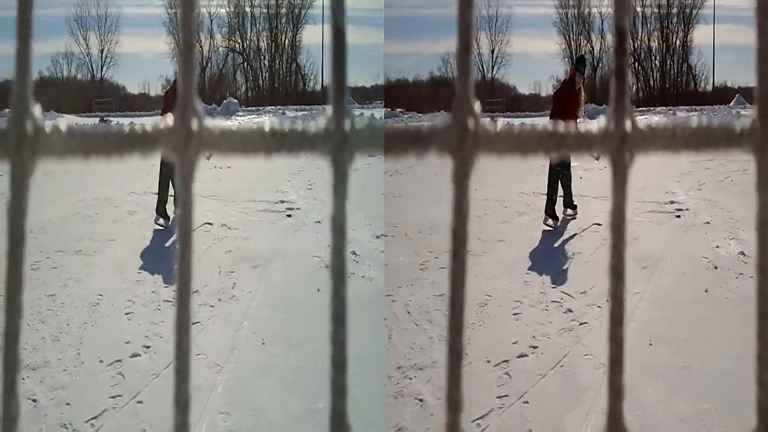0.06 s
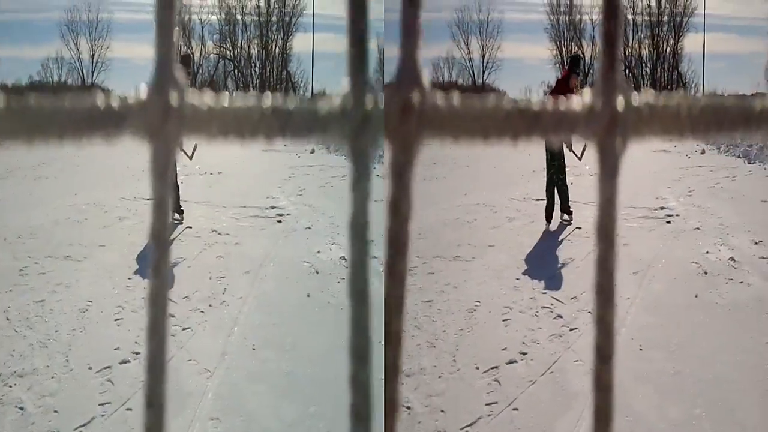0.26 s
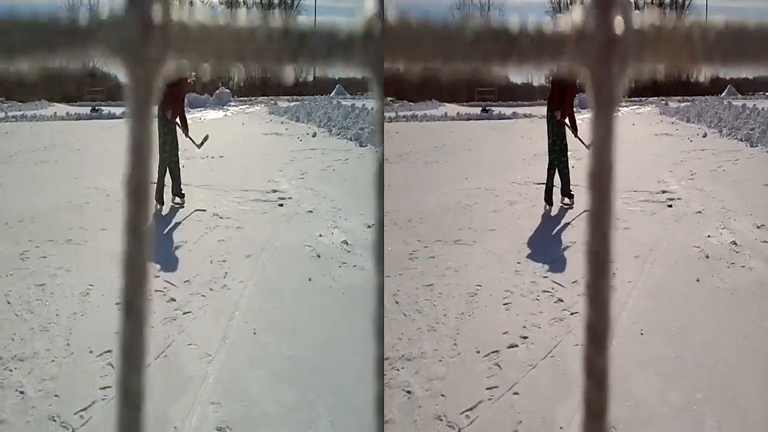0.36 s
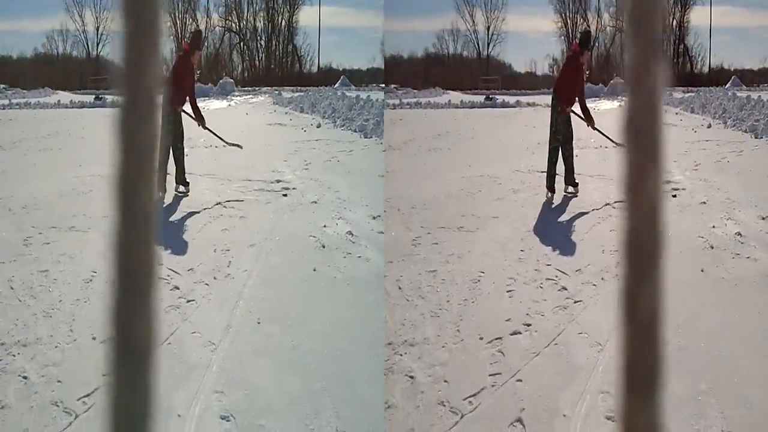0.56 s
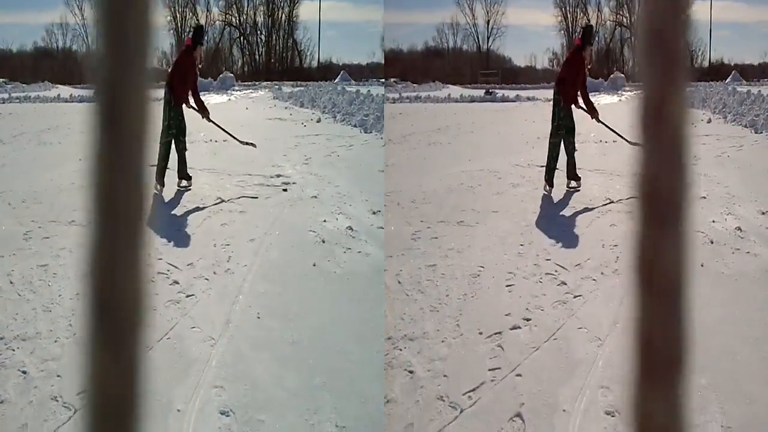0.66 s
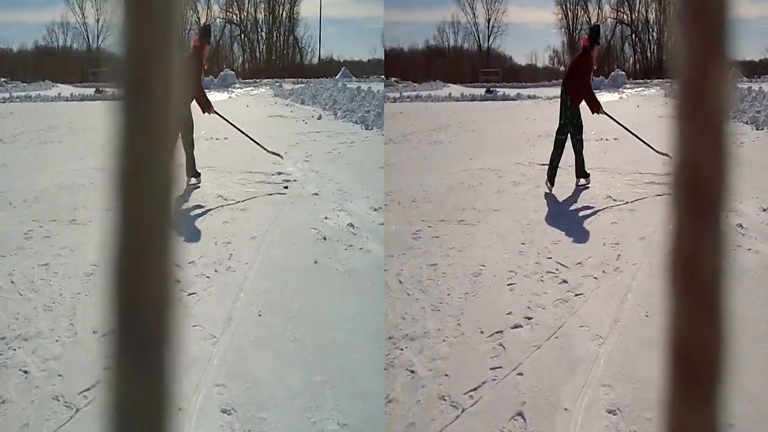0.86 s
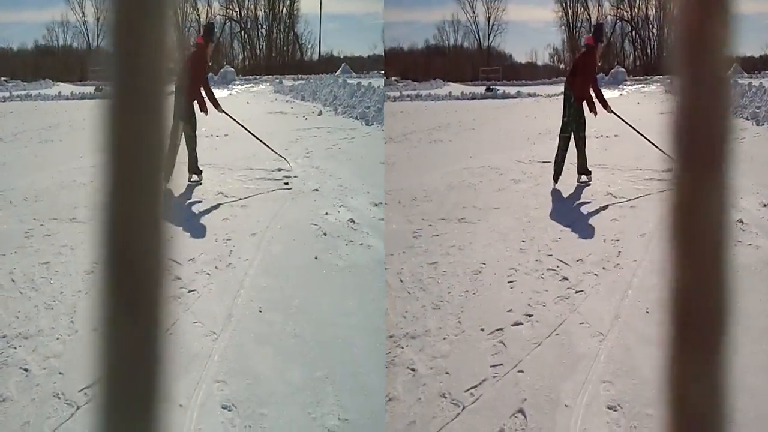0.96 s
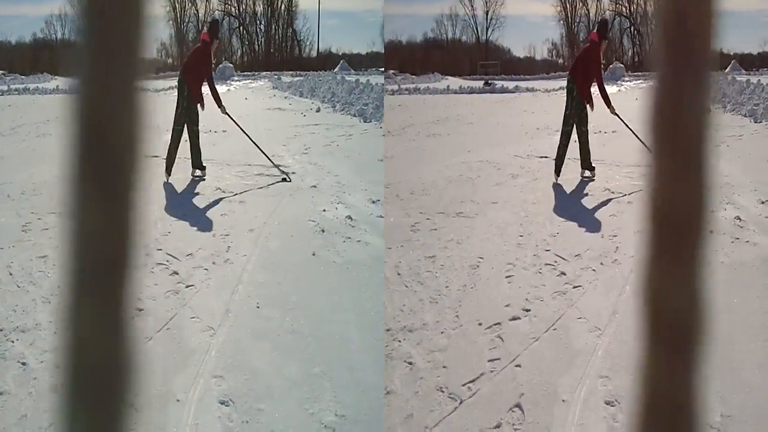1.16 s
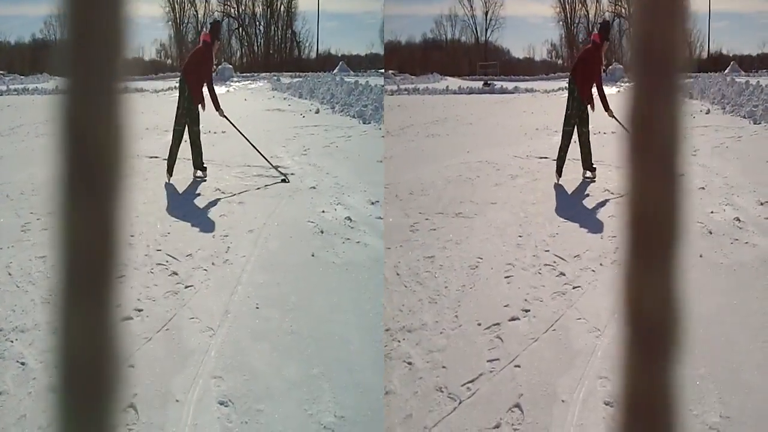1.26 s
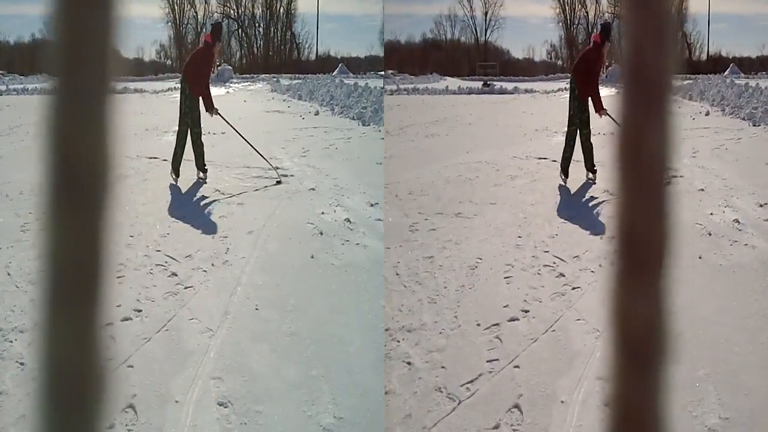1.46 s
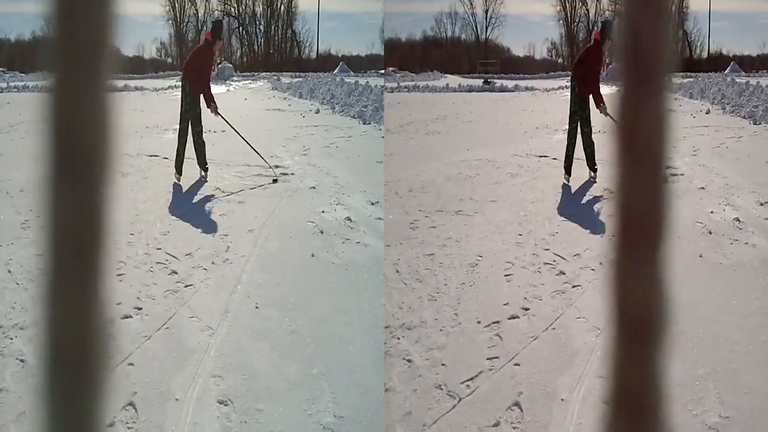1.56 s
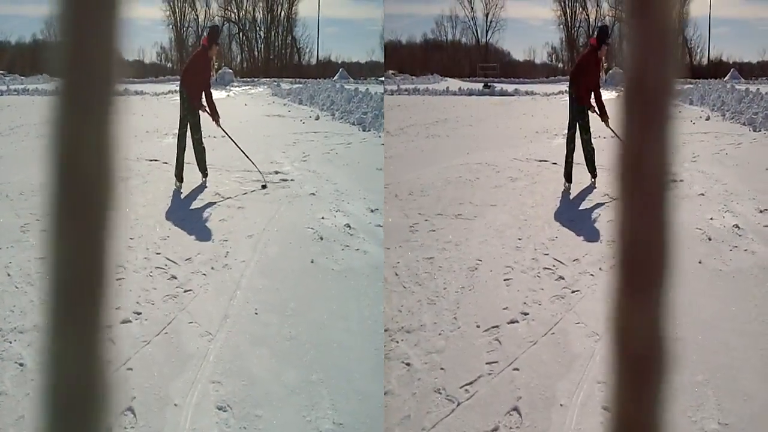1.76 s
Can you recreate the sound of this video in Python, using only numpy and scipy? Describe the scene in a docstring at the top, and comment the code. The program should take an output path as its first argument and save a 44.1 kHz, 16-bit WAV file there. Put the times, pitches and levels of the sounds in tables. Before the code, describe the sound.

A puck slams into a close wire fence with a clipped, bright crack, brief rattle and thin ringing wires; then quiet ticks and a long gritty stick scrape on an open snowy rink, close thin-sounding stereo microphone.

```python
"""A short scrape, a faint tick and a low hum lead in as the puck slides; then it slams into a wire mesh fence.
The slam is a clipped crack of damped modes and noise, a short rattle, then two wires that ring on and beat.
Out on the snowy rink, shaped noise makes stick and skates scrape and tick, and drags the blade in a long stroke.
Faint wind, a bed of coloured noise, lies underneath."""
import sys
import numpy as np
from scipy import signal
from scipy.fft import rfft, irfft, next_fast_len
from scipy.io import wavfile
from scipy.ndimage import uniform_filter1d, map_coordinates

SR = 44100
rng = np.random.default_rng(int(sys.argv[2]) if len(sys.argv) > 2 else 0)


def output_pcm(signal):
    """Save a mono or channel-first signal as 16-bit PCM at the path in sys.argv[1].

    Samples are clipped to [-1, 1] before scaling.
    """
    pcm = np.clip(np.atleast_2d(signal).T, -1, 1) * 32767
    wavfile.write(sys.argv[1], SR, np.round(pcm).astype(np.int16))


N = 79380  # samples, 1.8 s


def amp(db):
    """Decibels to gain."""
    return 10 ** (np.asarray(db) / 20)


def unit(x):
    """Scale to rms 1."""
    return x / np.sqrt(np.mean(x ** 2) + 1e-20)


def along(points, hz):
    """Read a table of (f/Hz, value) on a log frequency axis."""
    f, value = np.transpose(points)
    return np.interp(np.log(hz + 1), np.log(f + 1), value)


def curve(points):
    """Read a table of (t/s, value) at every sample."""
    return np.interp(np.arange(N) / SR, *np.transpose(points))


def since(s):
    """Seconds since s, zero before it."""
    return np.maximum(np.arange(N) / SR - s, 0)


def burst(s, t60, attack=0.00069):
    """Envelope from s on: a quick attack and an exponential release of 60 dB in t60 seconds."""
    age = since(s)
    return (1 - np.exp(-age / attack)) * amp(-60 * age / t60)


def wobble(rate):
    """A smooth random curve, rate knots a second."""
    knots = rng.standard_normal(4096)
    return map_coordinates(knots, [np.arange(N) * rate / SR], mode="wrap")


def filtered(x, response):
    """Multiply the spectrum of x by a response of frequency, padded against wrap-around."""
    m = next_fast_len(N + SR // 2)
    hz = np.fft.rfftfreq(m, 1 / SR)
    return irfft(rfft(x, m) * response(hz), m)[..., :N]


def hiss(colour):
    """Mono coloured noise of rms 1."""
    return unit(filtered(rng.standard_normal(N), lambda hz: amp(along(colour, hz))))


def rush(colour, alike):
    """Stereo coloured noise of rms 1; mixing mid and side sets how alike left and right are."""
    def mid_side_gains(hz):
        turn = np.arccos(np.clip(along(alike, hz), 0, 1)) / 2
        return np.array([np.cos(turn), np.sin(turn)])

    mid, side = filtered(np.array([hiss(colour), hiss(colour)]), mid_side_gains)
    return unit(np.array([mid + side, mid - side]))


def band(hz, width):
    """A narrow band of noise of rms 1."""
    return unit(filtered(rng.standard_normal(N), lambda f: 1 / (1 + (2 * (f - hz) / width) ** 4)))


def ports(x, balance, phase=((1, 0),)):
    """Level and phase differences between the two microphone ports, split evenly over both."""
    half = np.array([[.5], [-.5]])
    return filtered(x, lambda hz: amp(half * along(balance, hz)) * np.exp(1j * half * along(phase, hz)))


def ring(modes, s):
    """Damped sine modes set going together at s."""
    t = since(s)[:SR * 3 // 2 + SR // 4]
    tone = sum(amp(db - 60 * t / t60) * np.sin(2 * np.pi * hz * t) for hz, db, t60 in modes)
    return np.pad(tone, (0, N - len(t)))


HIT_S, REBOUND_S = 0.1825, .529  # the slam, and a light second knock
# Free wires that ring on after the slam, and other wires set going by the second knock.
# Columns of both: f/Hz, level/dB, t60/s
FREE_WIRES = [(1765.7, -40, 2.01), (1800, -50.5, 1), (1858.4, -30, 1.195), (1958, -40, 0.27),
              (2020, -48, 0.97), (2110, -56.5, .5), (5020, -55, 0.51), (5500, -42.5, .14), (9500, -41, .2),
              (9637, -40.5, 0.2), (9987, -37, .15)]
REBOUND_WIRES = [(1345, -50, 0.1), (1907, -51, 0.4), (2140, -61, 0.17), (2380, -51.5, 0.13),
                 (5830, -62, 0.28)]
# Colour of the rattling mesh joints: f/Hz, level/dB
RATTLE_COLOUR = [(100, -33), (350, -13), (700, -6), (1500, -2.5), (2300, -1), (3800, -4), (4300, -6.5),
                 (5200, 1), (7000, -10), (9800, 0), (12500, -12.5), (15500, -15)]
RATTLE_DB, RATTLE_T60_S = -14, 0.077
SHIVER_DB, SHIVER_T60_S = -43.5, 0.37  # the fainter, longer tail of the rattle
BUZZ_DEPTH, BUZZ_T60_S = .08, 0.93  # wires chatter against their neighbours while they swing wide
# Left minus right at the ports for the fence: f/Hz, level/dB
FENCE_PORT_BALANCE = [(60, 0.5), (350, 1.5), (2700, -1), (6000, 6.5), (8600, 10.5), (10200, 8.5),
                      (11600, -11), (12700, -16), (14800, -2)]
# Lead of the left port for the fence: f/Hz, phase/rad
FENCE_PORT_PHASE = [(300, .25), (1300, .45), (2800, .95), (7000, 1.7), (9500, 2.1), (12500, 1.4)]


def fence():
    """The puck cracks against the mesh; its joints rattle as noise and the free wires ring on as sines."""
    rattle = amp(RATTLE_DB) * burst(HIT_S, RATTLE_T60_S, attack=0.0022)
    shiver = amp(SHIVER_DB + 3 * wobble(350)) * burst(HIT_S, SHIVER_T60_S)
    joints = (rattle + shiver) * rush(RATTLE_COLOUR, [(1000, 1.0), (10000, 0.25)])
    buzz = 1 + BUZZ_DEPTH * burst(HIT_S, BUZZ_T60_S) * wobble(370)
    wires = buzz * ring(FREE_WIRES, HIT_S) + ring(REBOUND_WIRES, REBOUND_S)
    return ports(impact() + wires + clusters() + joints, FENCE_PORT_BALANCE, FENCE_PORT_PHASE)


# Contacts of puck and wires, timed from the first touch: t/ms, level/dB, softness/ms
PUCK_CONTACTS = [(0, -4.5, 0.15), (1.4, -0.5, 0.006), (3.1, -6.5, 0.006), (7.8, -27.5, 0.015),
                 (12.1, -33, 0.012)]
# Damped modes of the mesh at the point of impact: f/Hz, level/dB, t60/s
MESH_MODES = [(502.3, -27.5, 0.046), (922.7, -20, 0.03), (1151.8, -16, 0.028), (1364, -16.5, 0.021),
              (1496, -21, 0.028), (2262, -20.5, 0.031), (2734, -25.5, 0.0098), (3272, -17.5, 0.022),
              (3496, -24, 0.037), (3809, -13.5, 0.018), (4575, -22, .015), (5197, -18, 0.042),
              (7600, -18, .018), (8670, -14, 0.023), (9892, -3.5, .014), (10680, -14.5, 0.027),
              (11350, -4.5, 0.008), (12530, -13.5, 0.011)]
# Colour of the noise in the crack: f/Hz, level/dB
CRACK_COLOUR = [(150, -26.5), (600, -19), (1200, 1.5), (4000, 0), (7000, -3), (10000, 3), (12300, -8),
                (15500, -11)]
CRACK_DB, CRACK_T60_S = -1.5, 0.0083


def impact():
    """Each contact cracks and pumps the mesh's damped modes; a softer contact drives the high ones less."""
    t = np.arange(SR // 4) / SR
    contacts = [(np.maximum(t - HIT_S - ms / 1000, 0), db, soft) for ms, db, soft in PUCK_CONTACTS]

    def force(hz, db, soft_ms):
        return amp(db) / (1 + (np.pi * hz * soft_ms / 1000) ** 2)

    def decay(age, t60):
        return (1 - np.exp(-age / .0001)) * amp(-60 * age / t60)

    out = np.zeros(len(t))
    for hz, level, t60 in MESH_MODES:
        swing = sum(force(hz, db, soft) * decay(age, t60) for age, db, soft in contacts)
        out += amp(level) * swing * np.sin(2 * np.pi * (hz * t + rng.random()))
    for age, db, soft in contacts:
        crack = filtered(hiss(CRACK_COLOUR), lambda hz: force(hz, db, soft))[:len(t)]
        out += amp(CRACK_DB) * crack * decay(age, CRACK_T60_S)
    return np.pad(out, (0, N - len(t)))


# Groups of nearly equal short wires, blurred into bands: f/Hz, width/Hz, level/dB, t60/s
WIRE_CLUSTERS = [(694, 150, -52.5, .33), (1880, 260, -36, 0.67), (3860, 260, -46, .3),
                 (5150, 660, -38.5, 0.31), (9450, 470, -33.5, 0.12)]


def clusters():
    """Many short wires ring together as narrow bands of noise."""
    return sum(amp(db) * band(hz, width) * burst(HIT_S, t60) for hz, width, db, t60 in WIRE_CLUSTERS)


# Sweep of the stick and the skates: t/s, level/dB
SWEEP_LEVEL = [(0, -46), (.024, -52.5), (.06, -48.5), (.105, -44.5), (.15, -50.5), (.18, -55), (.25, -54),
               (.3, -67), (.342, -57.5), (.362, -100), (.382, -59.5), (.392, -57), (.408, -63.5),
               (.452, -61.5), (.51, -77), (.9, -67), (1, -67.5)]
# Colour of that sweep: f/Hz, level/dB
SWEEP_TONE = [(88, -55), (150, -18), (204, -15.5), (364, -24.5), (556, -8), (918, -18.5), (1180, -14),
              (1800, -14.5), (2270, -8), (3400, -15), (4370, -13.5), (5510, -21), (7350, -10.5),
              (12100, -13.5), (15000, -19.5)]
# Blade dragged over the ice: t/s, level/dB
DRAG_LEVEL = [(.9, -92.5), (.958, -62), (.968, -52.5), (.995, -48.5), (1.015, -49.5), (1.06, -49),
              (1.12, -52), (1.25, -53), (1.277, -61.5), (1.285, -52.5), (1.35, -53), (1.374, -46),
              (1.39, -54), (1.48, -52), (1.515, -59), (1.568, -55), (1.582, -65.5), (1.63, -71.5),
              (1.8, -74.5)]
# Colour of its grains before the stick resonates: f/Hz, level/dB
DRAG_TONE = [(80, -13.5), (300, -8), (550, 1.5), (2000, 1.5), (4000, -1.5), (7000, -0.5), (12500, 1),
             (14000, -5.5), (15200, -10.5)]
# Resonances of the stick: f/Hz, width/Hz, level/dB
STICK_RESONANCES = [(534, 100, 5), (1152, 120, 6.5), (1865, 230, 9.5), (2380, 110, 3.5), (2790, 200, 5.5),
                    (3640, 170, 9), (4460, 400, 0), (5750, 440, -4), (6665, 330, 2), (9040, 770, 2.5)]
# Likeness of left and right for rink noises: f/Hz, likeness/0 to 1
RINK_LIKENESS = [(60, 0.34), (240, 0.93), (950, 1), (3770, 0.99), (15000, 0.5)]
PATCHY_DB = 2  # rms depth of the colour shifts
# The blade catches on ridges of ice, and each catch rings the stick; CATCH_DB is relative to the rasp.
CATCHES_PER_S, CATCH_DB, CATCH_SCATTER_DB = 110, -12, 0.5


def scrapes():
    """Grainy friction on snowy ice; the drag and its coarse catches sound through the stick's resonances."""
    sweep_level = amp(curve(SWEEP_LEVEL) + 2.6 * wobble(310) + 0.4 * wobble(40))
    sweep = rush(SWEEP_TONE, RINK_LIKENESS) * sweep_level

    def stick(f):
        return sum(amp(db) * 1j * f * width / (centre ** 2 - f * f + 1j * f * width)
                   for centre, width, db in STICK_RESONANCES)

    grains = rush(DRAG_TONE, RINK_LIKENESS) * amp(1.9 * wobble(700))
    rasp = unit(patchy(filtered(grains, lambda f: 1 + stick(f)), PATCHY_DB))
    moments = rng.random(N) < CATCHES_PER_S / SR
    catches = moments * amp(CATCH_SCATTER_DB * rng.uniform(-1.2, 1, N))
    drag = unit(drifting(rasp + amp(CATCH_DB) * unit(filtered(catches, stick))))
    return sweep + slide() + bite() + drag * amp(curve(DRAG_LEVEL) + .8 * wobble(110))


def patchy(x, depth_db):
    """The colour shifts at random from moment to moment, in smooth patches of time and frequency."""
    z = signal.stft(x, nperseg=512)[2]
    field = rng.standard_normal(z.shape[1:])
    field = uniform_filter1d(field, size=5, axis=0)  # across frequency
    field = uniform_filter1d(field, size=12, axis=1)  # across time
    return signal.istft(z * amp(depth_db * unit(field)), nperseg=512)[1][:, :N]


DRIFT_SHARE, DRIFTS_PER_S = .022, 14  # scale of the relative pitch change, and its random knots a second


def drifting(x):
    """The resonances slide a little in pitch as the blade rolls and the pressure shifts."""
    place = np.arange(N) + np.cumsum(DRIFT_SHARE * wobble(DRIFTS_PER_S))
    return np.array([map_coordinates(side, [place], order=5, mode="mirror") for side in x])


BITE_S, BITE_LENGTH_S, BITE_DB = 0.96, 0.16, -48.5
BITE_FROM_HZ, BITE_TO_HZ, BITE_HALF_WIDTH_HZ = 5600, 2240, 1400


def bite():
    """As the blade bites in, low noise on a falling sine makes a rasp that swells, sinks in pitch and fades."""
    u = np.clip(since(BITE_S) / BITE_LENGTH_S, 0, 1)
    hz = BITE_FROM_HZ * (BITE_TO_HZ / BITE_FROM_HZ) ** u
    noise = rng.standard_normal(N)
    rasp = unit(filtered(noise, lambda f: 1 / (1 + (f / BITE_HALF_WIDTH_HZ) ** 2)))
    carrier = np.sin(2 * np.pi * np.cumsum(hz) / SR)
    return amp(BITE_DB) * np.sin(np.pi * u) * rasp * carrier


SLIDE_S, SLIDE_LENGTH_S, SLIDE_DB, SLIDE_HZ, SLIDE_WIDTH_HZ = .02, 0.19, -55, 536, 70


def slide():
    """The puck gliding towards the fence hums: a narrow noise band that swells and fades."""
    u = np.clip(since(SLIDE_S) / SLIDE_LENGTH_S, 0, 1)
    return amp(SLIDE_DB) * np.sin(np.pi * u) * band(SLIDE_HZ, SLIDE_WIDTH_HZ)


# Sharp ticks of ice and snow crumbs (the first, at the very start, is the tail of a stick hit), thin high chips
# of ice, knocks of stick and puck on the ice. Columns of all three: t/s, level/dB, t60/s
ICE_TICKS = [(.0018, -27, 0.024), (0.4473, -51, 0.099), (.657, -59.5, 0.061), (0.717, -44, 0.024),
             (0.7517, -36, 0.01), (0.7525, -27, 0.0052), (0.755, -39.5, 0.0055), (1.2648, -42, 0.0082),
             (1.5339, -38.5, 0.0096), (1.566, -41, 0.012)]
ICE_CHIPS = [(0.16, -38.5, .015), (0.572, -50, 0.02), (0.827, -52, 0.058), (0.9221, -47, 0.056),
             (0.986, -51, 0.61), (1.431, -46, 0.037), (1.547, -51, .035)]
ICE_KNOCKS = [(0.528, -47.5, 0.025), (0.533, -47, 0.049), (0.7468, -48, 0.015), (0.7522, -45, 0.016),
              (0.978, -35.5, 0.027), (1.002, -39, 0.024), (1.008, -39.5, 0.035), (1.448, -44, 0.021),
              (1.5228, -41.5, 0.02), (1.5575, -51, 0.011)]
# Dull bumps of the skates: t/s, level/dB
SKATE_BUMPS = [(.008, -40), (.054, -45), (0.571, -55), (0.8154, -54), (0.942, -54), (1.369, -52),
               (1.401, -55)]
# Colours of the four kinds: f/Hz, level/dB
TICK_TONE = [(300, -10), (2000, -5), (5000, -1), (9000, 8), (13000, 1), (15500, -1.5)]
CHIP_TONE = [(300, -23), (5000, -15.5), (8000, -2), (12000, 2.5), (15500, -7)]
KNOCK_TONE = [(150, -19), (600, -3.5), (1400, -2.5), (2300, -0.5), (5000, 1), (10000, -6.5), (13000, -2.5),
              (15000, -13)]
BUMP_TONE = [(80, -27), (300, -9), (530, 1.5), (900, -6), (3000, -23)]


def taps():
    """Bright ticks, thin chips, harder knocks and dull bumps: short bursts of coloured noise."""
    ticks = sum(amp(db) * burst(s, t60, attack=0.00015) for s, db, t60 in ICE_TICKS)
    chips = sum(amp(db) * burst(s, t60) for s, db, t60 in ICE_CHIPS)
    knocks = sum(amp(db) * burst(s, t60, attack=0.00041) for s, db, t60 in ICE_KNOCKS)
    bumps = sum(amp(db) * burst(s, t60=0.053, attack=0.00033) for s, db in SKATE_BUMPS)
    kinds = [(ticks, TICK_TONE), (chips, CHIP_TONE), (knocks, KNOCK_TONE), (bumps, BUMP_TONE)]
    return sum(level * rush(colour, RINK_LIKENESS) for level, colour in kinds)


# Colour of the wind: f/Hz, level/dB
WIND_COLOUR = [(25, 5.5), (60, 8), (150, 2.5), (300, -2.5), (750, -7), (1100, -11), (2000, -15),
               (3700, -16), (5700, -17.5), (8600, -14.5), (15000, -24.5)]
# Swell of the wind: t/s, level/dB
WIND_SWELL = [(0, -55.5), (.3, -69.5), (.62, -63.5), (.9, -61.5), (1.7, -61), (1.8, -61)]


def wind():
    """Light wind over the open rink: coloured noise whose level wavers."""
    air = rush(WIND_COLOUR, [(60, 0.61), (400, 1.0), (8000, 0.25)])
    return air * amp(curve(WIND_SWELL) + 1.3 * wobble(25))


# Left minus right at the ports for the rink: f/Hz, level/dB
RINK_PORT_BALANCE = [(4500, -0.5), (5600, 6.5), (7800, -0.5), (9900, 9), (11000, -5), (12600, -11),
                     (15000, -1)]


def scene():
    """The fence close by, the rink beyond it."""
    rink = scrapes() + taps() + wind()
    return fence() + ports(rink, RINK_PORT_BALANCE)


LOW_CUT_HZ, CLIP_TOP, TOP_HZ = 438, .95, 15450  # CLIP_TOP is a share of full scale


def record(dry):
    """The recorder thins the bass, clips the crack and keeps nothing above its band limit."""
    thin = filtered(dry, lambda hz: 1j * hz / (LOW_CUT_HZ + 1j * hz))
    clipped = np.clip(thin, -CLIP_TOP, CLIP_TOP)
    # the band limit is a 500 Hz wide slope centred on TOP_HZ
    return filtered(clipped, lambda hz: np.clip((TOP_HZ - hz) / 500 + .5, 0, 1))


dry = scene()
out = record(dry)
output_pcm(out)
```